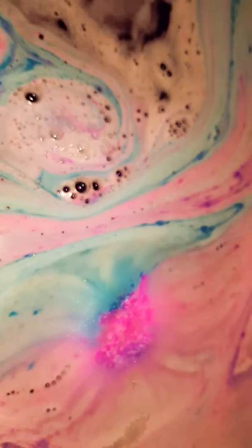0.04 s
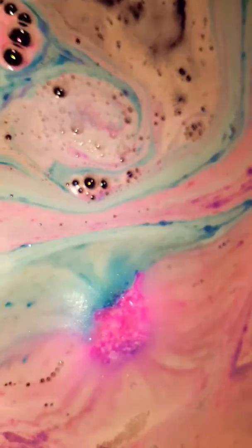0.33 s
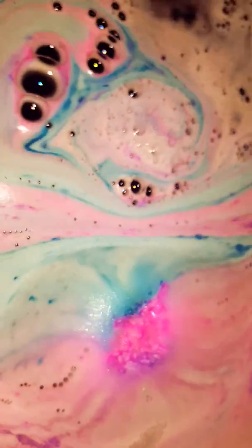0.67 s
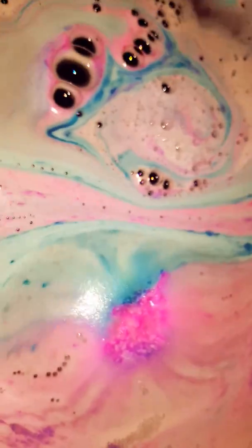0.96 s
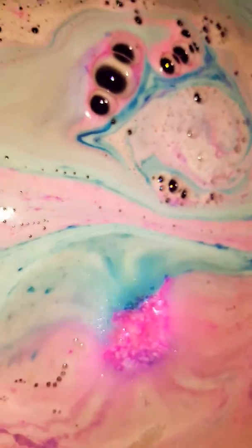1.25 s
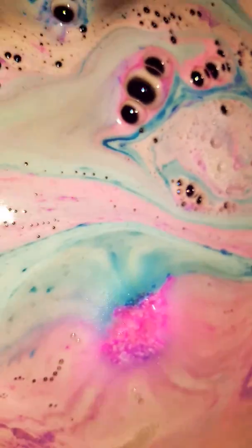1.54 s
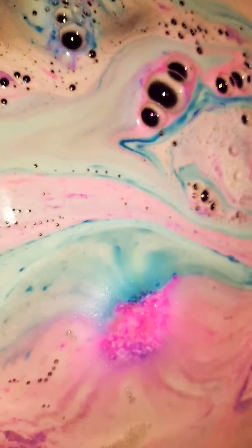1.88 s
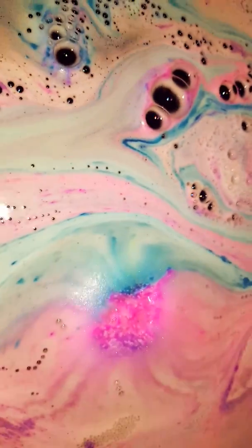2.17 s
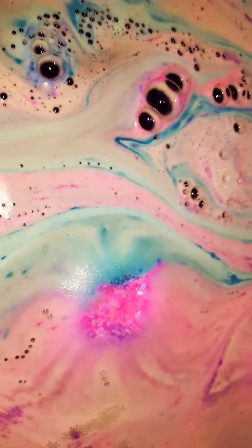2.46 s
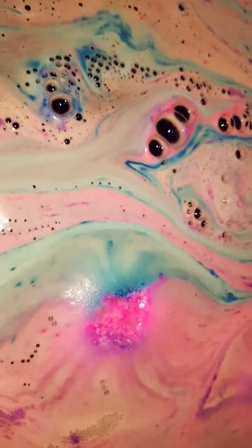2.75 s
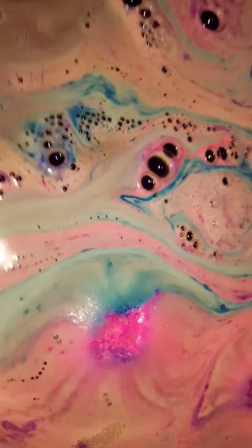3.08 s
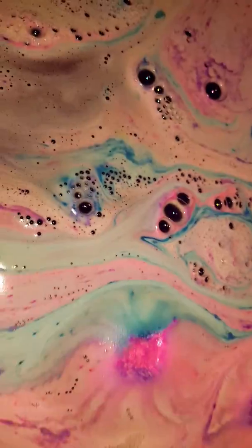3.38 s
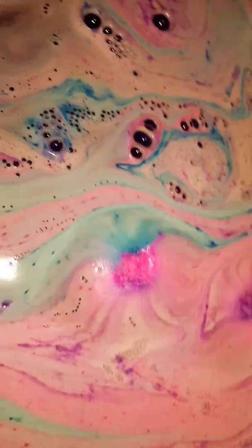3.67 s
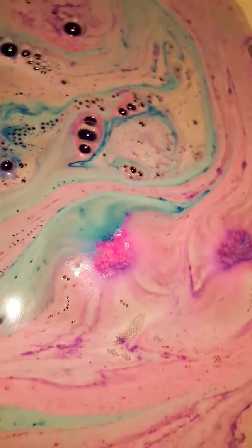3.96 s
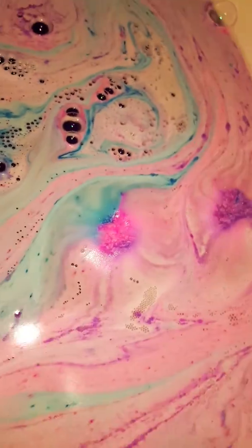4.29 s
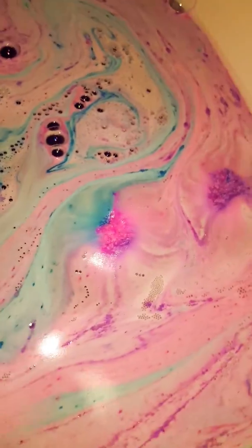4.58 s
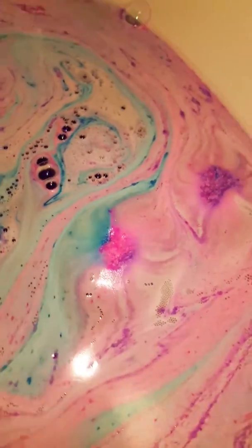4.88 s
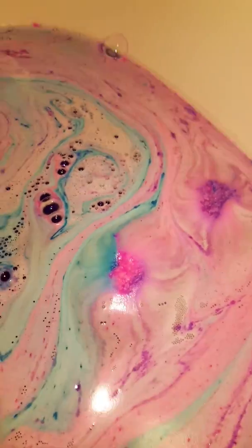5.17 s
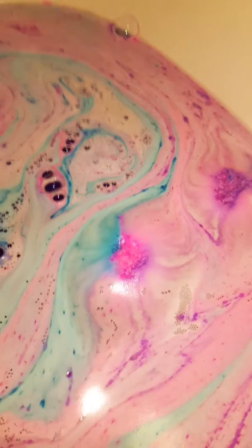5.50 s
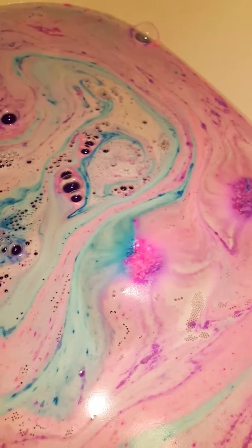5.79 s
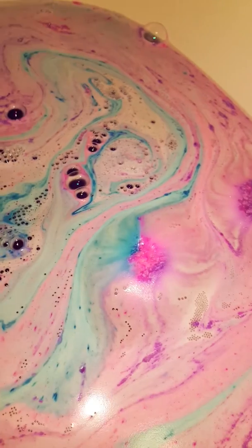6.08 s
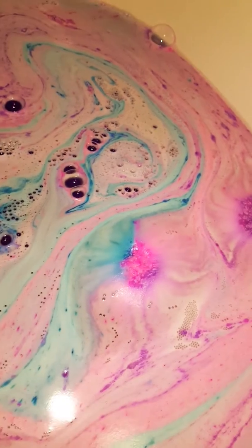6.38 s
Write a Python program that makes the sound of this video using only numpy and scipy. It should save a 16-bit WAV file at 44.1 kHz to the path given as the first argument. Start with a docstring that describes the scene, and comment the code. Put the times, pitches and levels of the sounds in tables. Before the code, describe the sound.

A throbbing low hum slowly swells behind a few tiny bubble snaps, brief rustles and soft bathtub bumps.

```python
"""A close rustle, and bubbles bursting on the foam as a bath bomb dissolves in a tub in a small hard room.
Each bubble snaps and rings briefly; a few more grainy rustles follow, and the water makes the tub boom.
A machine behind the wall hums, its shaft orders beating into two throbs a turn, and grows louder as it
slowly gains speed. A faint whine, rush and whir go with it, over low room noise."""
import sys
import numpy as np
from scipy import signal
from scipy.fft import rfft, irfft, next_fast_len
from scipy.io import wavfile
from scipy.ndimage import map_coordinates

SR = 44100
rng = np.random.default_rng(int(sys.argv[2]) if len(sys.argv) > 2 else 0)


def to_wav(sig):
    """Store sig (one row per channel, or 1-D mono) as 16-bit WAV at the path in sys.argv[1].

    Samples outside -1..1 are clipped; the rate is SR.
    """
    pcm = np.clip(np.atleast_2d(sig), -1, 1) * 32767
    pcm = np.round(pcm).astype(np.int16)
    wavfile.write(sys.argv[1], SR, pcm.T)  # frames by channels


N = 292824
TOP_HZ = 15520
LOAD_MIDDLE_S, LOAD_LENGTH_S = 3.65, 2.4  # the machine's one rise from low to full effort
# Spectrum of bright hiss. Each row: frequency in Hz, relative density in dB.
BRIGHT_SPECTRUM = [(3000, -33), (6500, 2.5), (8500, -10), (11500, -3.5), (15500, -5.5)]


def bubbles(ring_t60_s=0.013, lowpass_hz=7100):
    """Each film bursts with one sharp snap, and its cavity rings for a few milliseconds."""
    # Each row: start in seconds, level over 1 ms in dB, pitch in Hz, snap half-width in octaves,
    # ring re snap in dB.
    pops = [(.048, -48, 4050, 0.17, -11), (.055, -52, 4600, 0.26, -9), (.107, -50.5, 4600, .25, -12),
            (0.1188, -50.5, 5070, 0.44, -7), (.123, -54, 4640, 0.37, -8), (0.227, -50, 5500, 0.38, -14),
            (1.5105, -47.5, 4700, 0.79, -1), (1.548, -57, 5170, 0.27, -11), (1.969, -56.5, 5900, 0.49, -16),
            (2.093, -60, 4900, .3, -10), (2.459, -52.5, 4050, 0.31, -12), (2.490, -52.5, 3820, 0.31, -13),
            (2.7745, -58, 4800, 0.17, 1), (3.337, -49, 4500, .3, 2), (4.101, -51, 4000, 0.55, -10),
            (6.0907, -66, 4280, .36, -10)]
    out, t = np.zeros((2, N)), np.arange(SR // 20) / SR
    for start_s, db, hz, octaves, ring_db in pops:
        edges_hz = np.minimum(hz * 2.0 ** np.array([-octaves, octaves]), TOP_HZ)
        snap = signal.lfilter(*signal.butter(2, edges_hz, "band", fs=SR), t == 0)
        ring = np.sin(2 * np.pi * hz * t) * amp(-60 * t / ring_t60_s)
        burst = unit(unit(snap) + amp(ring_db) * unit(ring))
        pop = np.zeros(N)
        pop[round(start_s * SR):][:len(t)] = burst * np.sqrt(.001 / t[-1])
        out += amp(db) * in_room(pop, left_db=-34, wet_left_db=-7, wet_right_db=-.5)
    return signal.lfilter(*signal.butter(8, lowpass_hz, fs=SR), out)


def rustles(grain_db=2.5):
    """Brief close rustles: grainy rubbing noise with a low body and bright hiss on top."""
    # Each row: crest in seconds, level in dB, 60 dB rise and fall times in seconds,
    # body and hiss re rub in dB.
    strokes = [(0.0, -57, .1, 0.51, -8.5, 2), (3.336, -56, 0.27, 0.2, 0, -5.5),
               (4.10, -67, 0.19, 0.085, 0, -11), (4.106, -51.5, 0.028, 0.38, -0.5, -12),
               (6.02, -72.5, 0.23, 0.69, 0, -24), (6.55, -79.5, 0.59, 0.79, 12, -23)]
    # Rub and body spectra. Each row: frequency in Hz, relative density in dB.
    rub_spectrum = [(1000, -10.5), (2200, -8.5), (3000, -0.5), (3600, -0.5), (4400, 5), (5500, -7),
                    (6500, -10.5), (8400, -29), (11000, -17), (15000, -25)]
    body_spectrum = [(50, -7), (100, -1.5), (250, 0), (400, 15), (600, -1.5), (900, 3), (1250, -3),
                     (1800, 1.5), (3000, -1.5), (5000, -36), (9000, -52)]
    # The left side dips near 4 kHz. Each row: frequency in Hz, gain in dB.
    shade = [(800, 5.5), (2000, 0), (4300, -8), (8000, 6.5), (12000, 4.5)]
    t, flow = np.arange(N) / SR, np.zeros(N)
    grains = lambda: rng.standard_normal(N) * amp(grain_db * rng.standard_normal(N))
    rub = coloured(grains(), rub_spectrum)
    body = coloured(grains(), body_spectrum)
    hiss = coloured(grains(), BRIGHT_SPECTRUM)
    for crest_s, db, rise_s, fall_s, body_db, hiss_db in strokes:
        swell = amp(db - 60 * np.maximum((crest_s - t) / rise_s, (t - crest_s) / fall_s))
        flow += swell * (rub + amp(body_db) * body + amp(hiss_db) * hiss)
    left, right = in_room(flow, left_db=-27, wet_left_db=-6.5, wet_right_db=-10)
    return np.array([filtered(left, lambda hz: amp(along(shade, hz))), right])


def droplet(start_s=3.3372, db=-45.5, t60_s=.006):
    """A droplet flicks the surface: one very short, bright burst of noise."""
    age_s = np.arange(N) / SR - start_s
    decay = (age_s >= 0) * amp(db - 60 * np.abs(age_s) / t60_s)
    burst = decay * coloured(rng.standard_normal(N), BRIGHT_SPECTRUM)
    return in_room(burst, left_db=-7, wet_left_db=-13, wet_right_db=-10)


def tub_booms(rise_s=0.0081):
    """Moving water bumps the tub, which booms softly."""
    # Each row: start in seconds, level in dB, t60 in seconds.
    bumps = [(1.17, -66, 0.28), (2.56, -53, 0.27), (3.27, -70, .5), (4.11, -53.5, 0.77)]
    # Each row: frequency in Hz, relative density in dB.
    tub_spectrum = [(30, -15), (80, 11.5), (130, 1.5), (200, -15), (290, -2), (400, -11), (600, -15),
                    (1200, -38), (3000, -70)]
    t, swell = np.arange(N) / SR, np.zeros(N)
    for start_s, db, t60_s in bumps:
        age_s = np.maximum(t - start_s, 0)
        swell += amp(db - 60 * age_s / t60_s) * (1 - np.exp(-age_s / rise_s))
    return swell * diffuse(tub_spectrum)


def machine(throb_s=5.876):
    """A shaft gains speed under rising load; its hum orders peak together at throb_s."""
    # Each row: time in seconds, shaft speed in turns per second.
    speed = [(0.0, 12.436), (1.5, 12.477), (3.0, 12.577), (4.5, 12.719), (5.5, 12.8), (6.64, 12.834)]
    turns = np.cumsum(np.interp(np.arange(N) / SR, *np.transpose(speed))) / SR
    angle = 2 * np.pi * (turns - turns[round(throb_s * SR)])
    effort = ease(LOAD_MIDDLE_S, LOAD_LENGTH_S)
    return hum(angle) + whine(angle, effort) + rush(angle, effort)


def hum(angle, unsteady_db=0.4, pan_before_db=0.75, pan_after_db=-0.4, left_lag_rad=.14):
    """Three odd shaft orders swell and beat into a throb; the hum shifts slightly right."""
    # Each row: order, levels before and after in dB, middle and length of the swell in seconds.
    orders = [(13, -56.5, -52, 2.38, .5), (15, -59.5, -50, 3.27, 4.5), (17, -63, -52.5, 2.77, 7)]
    drift = ease(middle_s=4.2, length_s=1.2)
    pan_db = pan_before_db + (pan_after_db - pan_before_db) * drift
    side, out = np.array([[.5], [-.5]]), np.zeros((2, N))
    for order, before_db, after_db, middle_s, length_s in orders:
        db = before_db + (after_db - before_db) * ease(middle_s, length_s) + unsteady_db * wobble(3)
        phase = order * angle - side * left_lag_rad * drift
        out += np.sqrt(2) * amp(db + side * pan_db) * np.cos(phase)
    return out


def whine(angle, effort):
    """Faint high shaft orders waver more under load, differently on each side."""
    # Each entry: frequency in cycles per turn.
    orders = (19, 35, 48, 59, 64, 68, 72)
    # Each row, one per order: levels at low and at full effort in dB.
    levels = [(-69, -81), (-89.5, -75.5), (-85, -94.5), (-95.5, -75.5), (-81, -81), (-96, -77.5),
              (-88.5, -90)]
    waver_rad, out = .12 + .8 * effort ** 2, np.zeros((2, N))
    for order, (low_db, full_db) in zip(orders, levels):
        phase = order * angle + waver_rad * np.array([wobble(9), wobble(9)])
        out += np.sqrt(2) * amp(low_db + (full_db - low_db) * effort) * np.cos(phase)
    return out


def rush(angle, effort, low_db=-74, growth_db=6, flutter=0.11):
    """Machine noise that swells once a turn and grows with effort."""
    # Each row: frequency in Hz, relative density in dB.
    rush_spectrum = [(300, -8.5), (450, -4), (600, -8.5), (700, -1.5), (770, 3), (870, 0.5), (1050, -9),
                     (1350, -20), (2200, -24.5), (3500, -24), (4300, -30.5), (4800, -22.5), (5400, -40.5),
                     (7000, -43)]
    db = low_db + growth_db * effort + 0.84 * wobble(8)
    return amp(db) * (1 + flutter * np.cos(angle)) * diffuse(rush_spectrum)


def squeak(crest_s=5.942, db=-66, hz=1810, width_s=0.022):
    """One brief, far squeak: a tone with jittering phase."""
    t = np.arange(N) / SR
    swell = amp(db) * np.exp(-((t - crest_s) / width_s) ** 2)
    tone = np.sin(2 * np.pi * hz * t + 1.1 * wobble(220))
    return in_room(swell * tone, left_db=-9, wet_left_db=-5, wet_right_db=-5)


def whir(low_db=-82, growth_db=2.7, left_db=-3):
    """A wavering noise band near 1.9 kHz that grows with the machine's effort."""
    # Each row: frequency in Hz, relative density in dB.
    whir_spectrum = [(1400, -15.5), (1700, 6.5), (1800, 0), (1920, 8), (2020, -3), (2200, -39)]
    effort = ease(LOAD_MIDDLE_S, LOAD_LENGTH_S)
    db = low_db + growth_db * effort + 0.93 * wobble(3.1) + 1.6 * wobble(12)
    return amp(db) * diffuse(whir_spectrum) * amp([[left_db], [0]])


def background(air_db=-62.5, roar_db=-60, hiss_db=-76.5):
    """Wavering building tones, room air, a low roar and a faint hiss."""
    # Each row: frequency in Hz, level in dB.
    building_tones = [(80.7, -73.5), (100, -78), (301.5, -74)]
    # Noise spectra. Each row: frequency in Hz, relative density in dB.
    air_spectrum = [(20, -14), (42, -9.5), (55, -12), (80, 0), (125, -0.5), (200, 3.5), (420, -13.5),
                    (620, -21.5), (1300, -25.5), (2300, -28.5), (5000, -34.5), (9000, -41)]
    roar_spectrum = [(120, -19.5), (170, 4), (250, 9), (285, -3.5), (420, -4.5), (500, -7), (620, -20),
                     (1000, -39.5)]
    hiss_spectrum = [(1000, -3), (5000, -3), (8000, -7), (10000, -4), (12000, 0.5), (15500, 0)]
    t, tones = np.arange(N) / SR, np.zeros(N)
    for hz, db in building_tones:
        peak = np.sqrt(2) * amp(db + 2.4 * wobble(5.4))
        tones += peak * np.sin(2 * np.pi * hz * t + .6 * wobble(4))
    air = amp(air_db + 0.55 * wobble(3)) * diffuse(air_spectrum)
    roar = amp(roar_db + .8 * wobble(2.99)) * diffuse(roar_spectrum)
    hiss = amp(hiss_db) * coloured(rng.standard_normal((2, N)), hiss_spectrum)
    return tones + air + roar + hiss


def in_room(x, left_db, wet_left_db, wet_right_db):
    """Direct sound on the right, plus a fresh tail from the hard walls."""
    # Bathroom decay. Each row: frequency in Hz, t60 in seconds.
    room_t60 = [(200, 0.45), (2000, 0.5), (5000, 0.41), (12000, 0.54)]
    hz, t, noise = signal.stft(rng.standard_normal((2, SR // 2)), SR, nperseg=256)
    decay = amp(-60 * t / along(room_t60, hz)[:, None])
    tail = signal.istft(noise * decay, SR, nperseg=256)[1]
    wet = signal.fftconvolve(x[None], tail / np.linalg.norm(tail[0]), axes=1)[:, :N]
    return x * amp([[left_db], [0]]) + wet * amp([[wet_left_db], [wet_right_db]])


def diffuse(spectrum):
    """Stereo room noise at rms 1: alike in the bass, unrelated in the treble."""
    # Each row: frequency in Hz, left-right correlation.
    likeness = [(30, 0), (70, 0.78), (180, 1), (300, 1), (500, 0.4), (900, 0), (4000, 0)]
    # Each row: frequency in Hz, left minus right in dB.
    balance = [(200, 0), (450, -6.5), (750, 2), (1100, -2.5), (1900, -2), (4000, -4), (7000, -1)]
    spread_rad = lambda hz: np.arccos(np.clip(along(likeness, hz), -1, 1)) / 2
    mid = filtered(rng.standard_normal(N), lambda hz: np.cos(spread_rad(hz)))
    side = filtered(rng.standard_normal(N), lambda hz: np.sin(spread_rad(hz)))
    pan = lambda hz: amp(np.outer([.5, -.5], along(balance, hz)))
    return coloured(filtered(np.array([mid + side, mid - side]), pan), spectrum)


def amp(db):
    """Decibels to gain."""
    return 10 ** (np.asarray(db) / 20)


def unit(x):
    """x scaled to rms 1."""
    return x / np.sqrt(np.mean(x ** 2) + 1e-20)


def along(points, hz):
    """(Hz, value) points read on a log axis."""
    knots_hz, values = np.transpose(points)
    return np.interp(np.log(hz + 1), np.log(knots_hz + 1), values)


def ease(middle_s, length_s):
    """A smooth rise from 0 to 1."""
    return .5 + .5 * np.sin(np.pi * np.clip((np.arange(N) / SR - middle_s) / length_s, -.5, .5))


def wobble(rate_hz):
    """A smooth curve through random knots."""
    knots = rng.standard_normal(int(N * rate_hz / SR) + 4)
    return map_coordinates(knots, [np.arange(N) * rate_hz / SR])


def filtered(x, response):
    """x filtered by the gain response(hz)."""
    size = next_fast_len(N + SR // 2)
    return irfft(rfft(x, size) * response(np.fft.rfftfreq(size, 1 / SR)), size)[..., :N]


def coloured(x, spectrum):
    """x shaped by (Hz, dB) points, at rms 1."""
    return unit(filtered(x, lambda hz: amp(along(spectrum, hz))))


def scene():
    """The tub and the rustles in front, the machine and the room behind."""
    behind = machine() + squeak() + whir() + background()
    return bubbles() + rustles() + droplet() + tub_booms() + behind


def record(dry):
    """Brick-wall low-pass at TOP_HZ."""
    return filtered(dry, lambda hz: hz < TOP_HZ)


dry = scene()
out = record(dry)
to_wav(out)
```